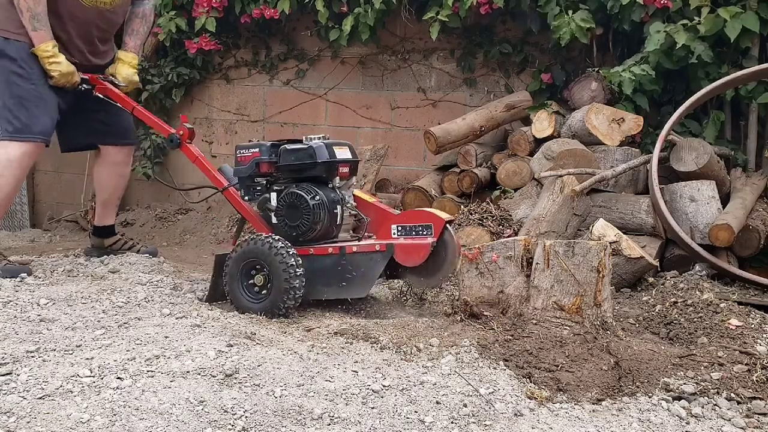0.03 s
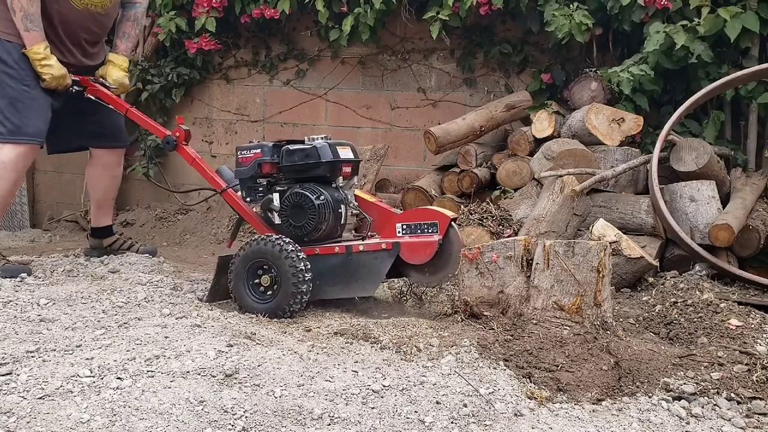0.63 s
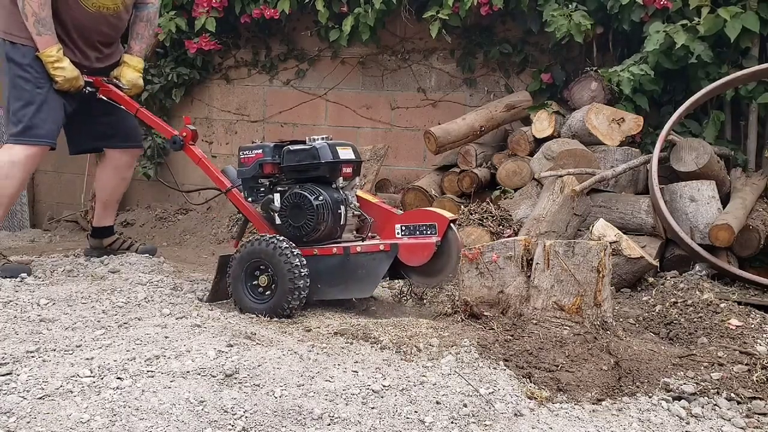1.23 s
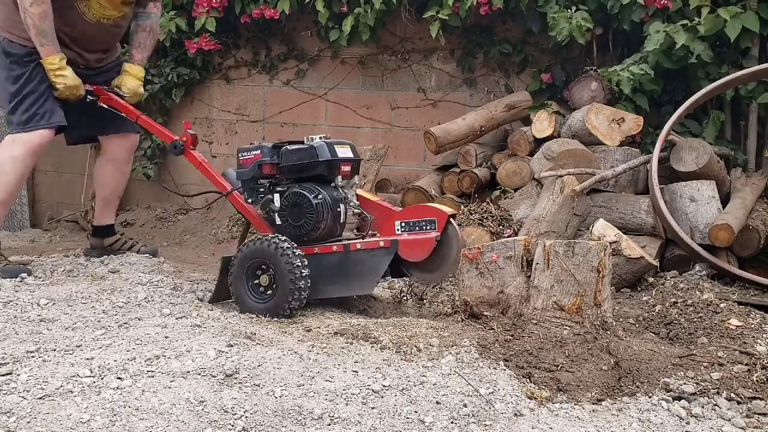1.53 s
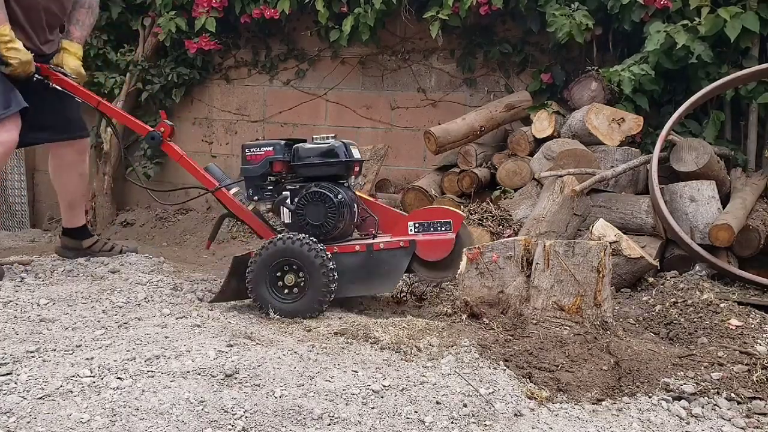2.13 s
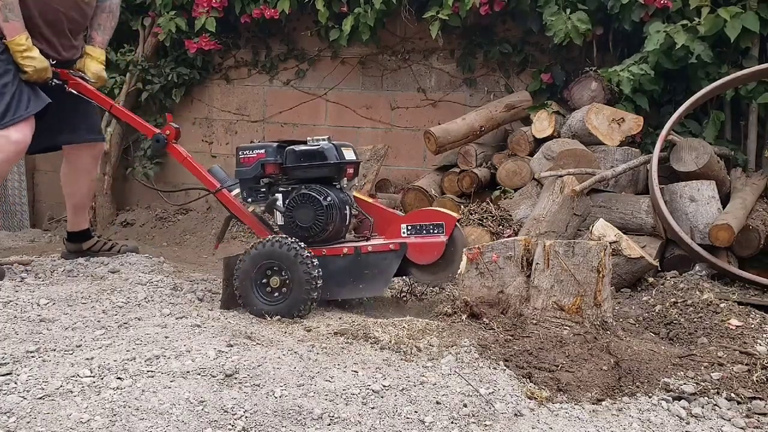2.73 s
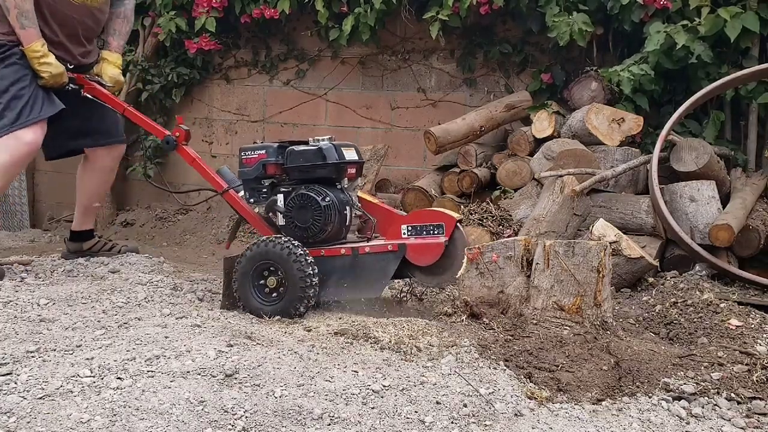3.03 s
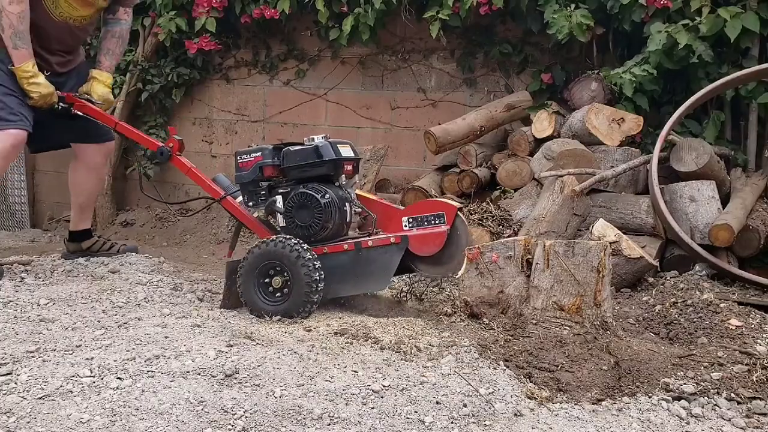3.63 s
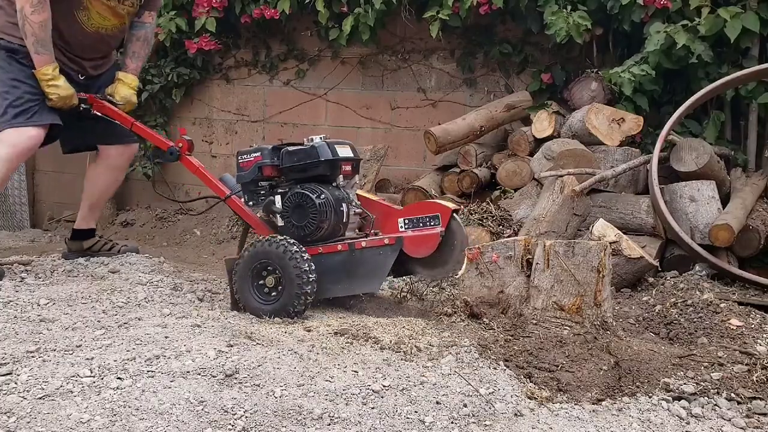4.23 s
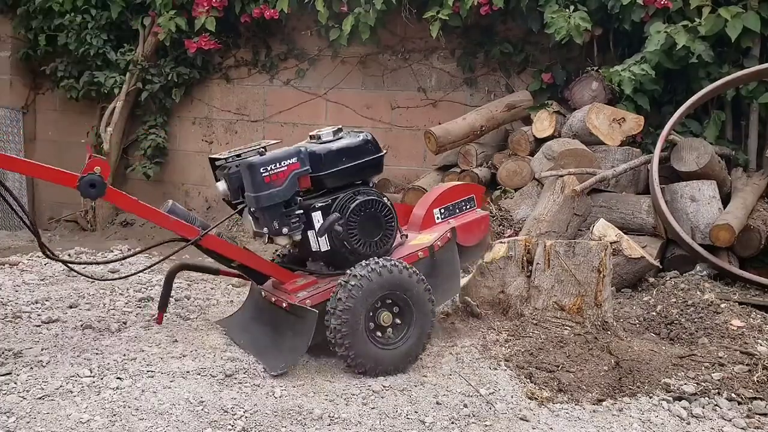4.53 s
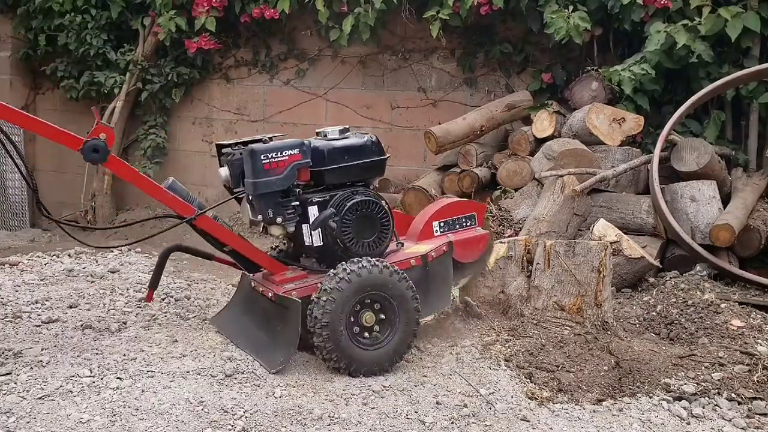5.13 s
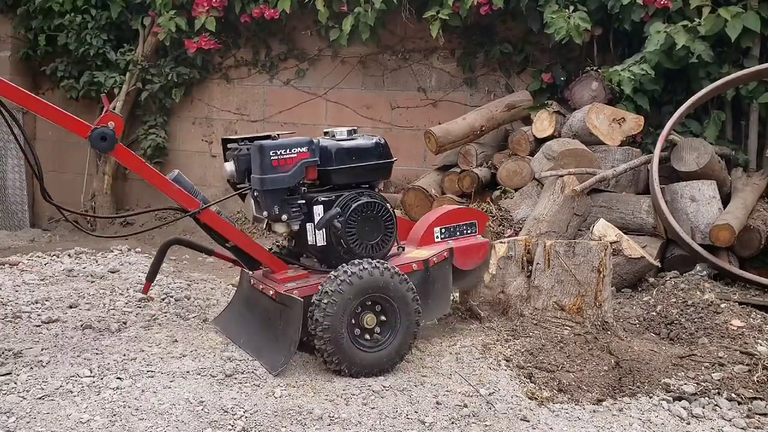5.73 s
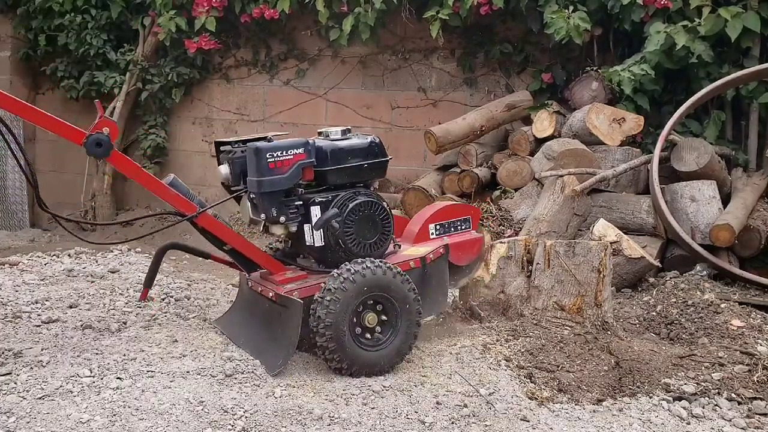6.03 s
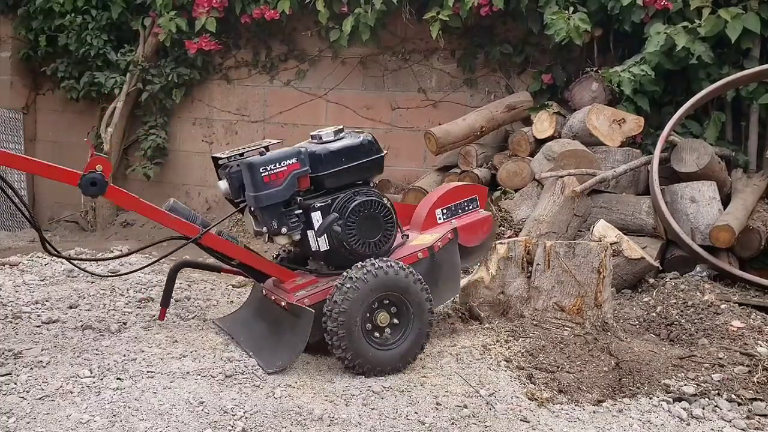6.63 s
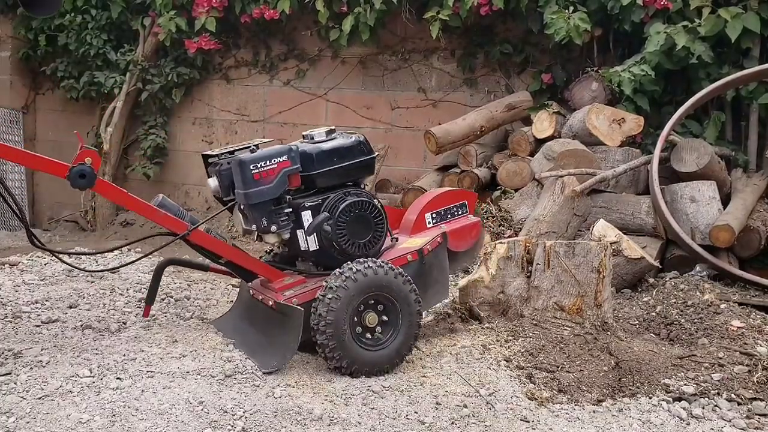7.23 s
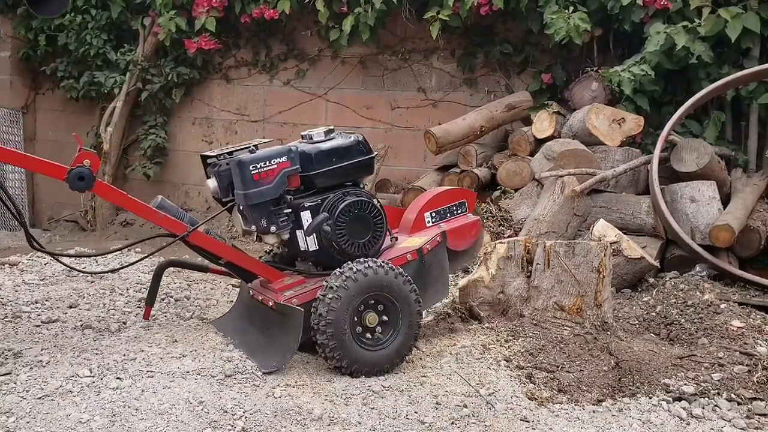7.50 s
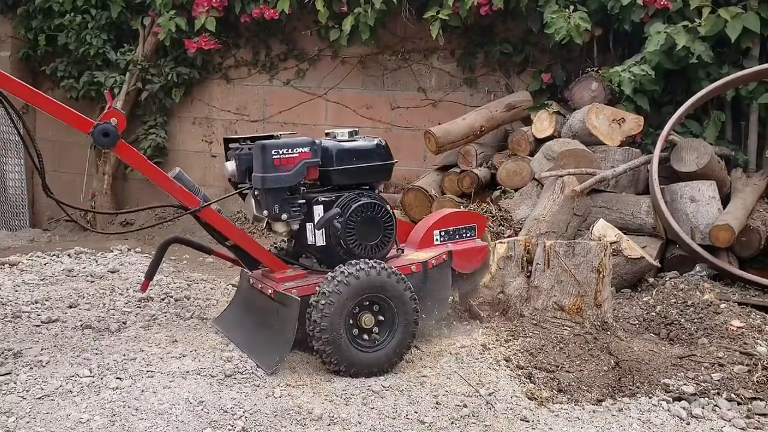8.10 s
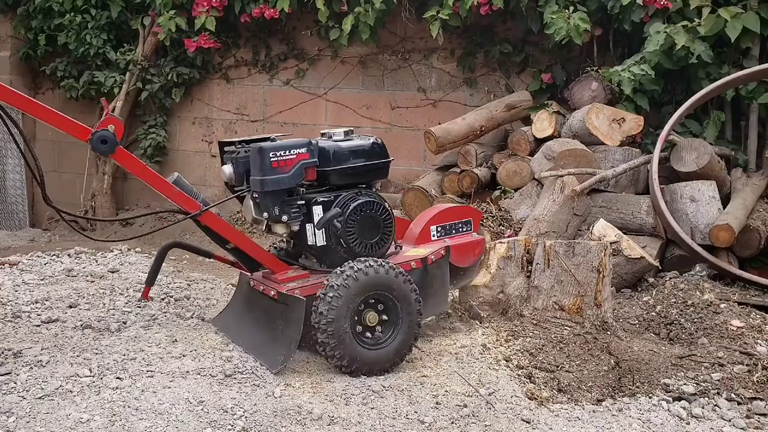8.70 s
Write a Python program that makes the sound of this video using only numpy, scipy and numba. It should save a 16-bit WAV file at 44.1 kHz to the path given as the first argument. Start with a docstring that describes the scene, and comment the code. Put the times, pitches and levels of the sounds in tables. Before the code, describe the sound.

Harsh, hissing rasp of a cutter wheel chewing a tree stump, over the high drone of a small petrol engine, all quick as if sped up. The pitch dips with each push into the wood, and thin steel squeaks and brief grating rings come and go. Midway the sound turns a little closer, and a few short jams rattle the machine near the end. Only a faint outdoor rumble lies behind it.

```python
"""Stump grinder in fast motion

A single-cylinder grinder works before a yard wall, sped up so that all is high and quick.
The governed engine sags under each push of the wheel and recovers between.
Teeth rasp through wood and throw chips; rubbing steel squeals in chirps.
Halfway through, the machine stands nearer, turned the other way, and deep bites make it judder."""
import sys
import numpy as np
from scipy import signal
from scipy.fft import rfft, irfft
from scipy.io import wavfile
from scipy.ndimage import uniform_filter1d, map_coordinates
from numba import njit

SR = 44100
rng = np.random.default_rng(int(sys.argv[2]) if len(sys.argv) > 2 else 0)


def generate_wav(sig):
    """Save sig (samples, or channels by samples) to the path in sys.argv[1] as 16-bit PCM at SR."""
    pcm = np.round(np.clip(np.atleast_2d(sig).T, -1, 1) * 32767).astype(np.int16)
    wavfile.write(sys.argv[1], SR, pcm)


N = 395136
TIME_S = np.arange(N) / SR


def undb(db):
    """Decibels to gain."""
    return 10 ** (np.asarray(db) / 20)


def unit(x):
    """Scale to rms 1."""
    return x / np.sqrt(np.mean(x ** 2))


def curve(table):
    """Join (time_s, value) rows by straight lines."""
    return np.interp(TIME_S, *np.transpose(table))


def gate(start_s, end_s, fade_s, edge_gain=0):
    """Trapezoid window passing through edge_gain at start and end."""
    return np.clip(np.minimum(TIME_S - start_s, end_s - TIME_S) / fade_s + edge_gain, 0, 1)


def walk(rate_hz):
    """Smooth random motion, spread near 1."""
    coarse_s = TIME_S[::10]
    knots = rng.standard_normal(len(coarse_s))
    return np.interp(TIME_S, coarse_s, map_coordinates(knots, [coarse_s * rate_hz], order=2, mode="wrap"))


def turns(hz):
    """Running phase in radians."""
    return 2 * np.pi * np.cumsum(hz) / SR


def colour(x, hz, db):
    """Filter by a spectrum drawn over log frequency."""
    bins_hz = np.maximum(np.arange(N // 2 + 1) * SR / N, 1)
    return irfft(rfft(x) * undb(np.interp(np.log(bins_hz), np.log(hz), db)), N)


def resonate(x, modes):
    """Sum of resonances, each at its own rms level."""
    return sum(undb(db) * unit(signal.lfilter(*signal.iirpeak(hz, hz / width_hz, SR), x))
               for hz, width_hz, db in modes)


@njit
def follow(x, initial, rise_s, fall_s):
    """One-pole lag with separate rise and fall times."""
    lagged, state = np.empty(len(x)), initial
    for i in range(len(x)):
        state += (x[i] - state) / (SR * (rise_s if x[i] > state else fall_s))
        lagged[i] = state
    return lagged


# stereo width: freq_hz, side_gain_db
SIDE_SPECTRUM = [(100, -1.5), (500, 2.5), (1200, -3), (3200, -56), (4300, -14.5), (8000, -9.5),
                 (15000, -7.5)]

def spread(mid, scattered):
    """Scattered sound makes the two ears differ."""
    side = colour(scattered, *np.transpose(SIDE_SPECTRUM))
    return np.array([mid + side, mid - side])


GOVERNED_HZ = 236.43  # unloaded firing rate
# pushes of the wheel into the stump: start_s, end_s, sag_hz
WHEEL_PUSHES = [(0.0, 0.101, 17.6), (0.119, 0.182, 19.8), (0.219, 0.318, 22.7), (0.343, 0.411, 19.7),
                (0.448, 0.759, 21), (0.785, 1.12, 20.5), (1.139, 1.445, 22.6), (1.504, 1.688, 15.8),
                (1.705, 1.82, 26), (1.853, 2.166, 22.9), (2.213, 2.728, 22.1), (2.766, 2.99, 22.3),
                (3.018, 3.344, 23.2), (3.366, 3.583, 20.6), (3.601, 4, 21.4), (4.033, 4.23, 25),
                (4.247, 4.399, 15.7), (4.496, 4.859, 12.7), (4.937, 5.029, 21), (5.062, 5.473, 28.4),
                (5.537, 5.874, 16.6), (5.91, 6.006, 27.7), (6.034, 6.206, 17.3), (6.231, 6.493, 24.5),
                (6.505, 6.755, 13.2), (6.755, 6.81, 44), (6.81, 7.019, 21), (7.347, 7.709, 18),
                (7.977, 8.391, 10.1), (8.451, 8.555, 19), (8.607, 8.929, 8.6)]

def firing_rate(jam_sag_hz=38.28, flywheel_s=.088, recover_s=.049, crank_s=.024, hunt_hz=1.3):
    """Pushes and jams drag the engine down; the governor restores it; crank inertia rounds each change."""
    loads = list(WHEEL_PUSHES) + [(start, end, jam_sag_hz) for start, end, _ in JAMS]
    load_hz = sum(hz * ((TIME_S >= start) & (TIME_S < end)) for start, end, hz in loads)
    sag_hz = follow(load_hz, WHEEL_PUSHES[0][2] / 2, flywheel_s, recover_s)  # starts mid-cut
    return GOVERNED_HZ - uniform_filter1d(sag_hz, int(crank_s * SR)) + hunt_hz * walk(28)


# throttle: time_s, level_db
THROTTLE = [(0, -31), (.1, -30), (1.4, -28), (2.7, -30), (4.5, -28), (6.7, -28), (6.85, -31.5),
            (7.25, -24.5), (7.68, -28), (7.75, -23.5), (8.1, -29.5), (8.96, -26.5)]
# exhaust harmonics: order, far_db, far_fast_change_db, near_db, near_fast_change_db
EXHAUST_ORDERS = [(1, -31.5, -1, -34, 0.5), (2, -12, -9, -11, 1), (3, -10.5, -0.5, -9, 0.5),
                  (4, -14, 8.5, -14.5, 0), (5, -3, 0.5, -3, 1), (6, -10, -3, -7, 3),
                  (7, -20.5, 0, -7.5, -2.5), (8, -26, -13, -24.5, 6), (9, -14.5, -11, -10, -4.5),
                  (10, -23.5, 1.5, -21, 2), (11, -15, 5.5, -35, -17)]

def engine(firing_hz, near, jammed, choke_db=-8, waver_db=1.19, flicker_db=.4, smear_rad=.52):
    """Exhaust harmonics slide with speed over the peaks and notches of the wall's echo; jams choke them."""
    fast = np.tanh((firing_hz - 219) / 11)
    phase = turns(firing_hz * (1 + .0015 * walk(150)))
    exhaust = 0
    for order, far_db, far_fast_db, near_db, near_fast_db in EXHAUST_ORDERS:
        db = (1 - near) * (far_db + far_fast_db * fast) + near * (near_db + near_fast_db * fast)
        unsteady = np.clip(order / 5, 1, 2)
        gain = undb(db + unsteady * (waver_db * walk(14) + flicker_db * walk(110)))
        # the silencer scatters the phases of each pulse
        angle = round(order) * phase - np.pi / 2 + smear_rad * rng.standard_normal()
        skew = min(2 / order, 1)  # low orders reach the ears unequally
        pan, lead_rad = undb(3.5 * skew ** 2 / 2), .14 * max(skew, .5)
        exhaust += gain * np.sqrt(2) * np.array([np.sin(angle + lead_rad) / pan, np.sin(angle) * pan])
    return undb(curve(THROTTLE) + choke_db * jammed) * exhaust


# cutter wheel harmonics: tooth_order, level_db
WHEEL_ORDERS = [(1, -20), (2, -16.5), (3, -10), (4, -21), (5, -13.5)]

def wheel(tooth_hz, slip=.00308, waver_db=3.5, gain_db=-1):
    """The teeth hum, unsteady as the belt slips, louder with throttle, snatches and scraping."""
    drive_db = curve(THROTTLE) + gain_db + 1.5 * snatch_db() + .38 * curve(SIDE_SCRAPE)
    phase = turns(tooth_hz * (1 + slip * walk(25)))
    lead_rad = np.array([[.013], [0]])
    hum = sum(undb(db + waver_db * walk(28)) * np.sin(round(order) * phase + lead_rad)
              for order, db in WHEEL_ORDERS)
    return undb(drive_db) * np.sqrt(2) * hum


# depth of cut: time_s, level_db
CUT_DEPTH = [(0, -27.5), (0.57, -31.5), (0.65, -28.5), (1.5, -27.5), (1.66, -29.5), (2.44, -26.5),
             (2.72, -30), (3.1, -28.5), (3.69, -28.5), (4.3, -27.5), (5.74, -25.5), (5.89, -28.5),
             (6.6, -24.5), (6.85, -30), (7.14, -24), (7.81, -23.5), (8.31, -28.5), (8.96, -25)]
# wood scraping the wheel's side: time_s, disc_ring_db
SIDE_SCRAPE = [(0, -6.5), (2.3, -1), (4.4, -10), (5.4, 1.5), (5.82, 5.5), (5.879, -3), (6.5, -2.5),
               (7.6, -15), (8.1, 5), (8.3, 4), (8.6, -26)]
# rasp through the wheel housing: freq_hz, far_db, near_db
RASP_SPECTRUM = [(150, -33, -34), (324.9, -23, -23.5), (805, -15.5, -16.5), (884, -15, -14.5),
                 (1360, -6, -5), (1550, -1, -2), (1690, -5.5, -9), (2030, -5, -7.5), (3110, -2.5, -2),
                 (3450, 2, -5), (4080, 1, -1), (4900, 2, 1), (5000, -2.5, -0.5), (5340, 3, 1),
                 (6620, -2, -1), (7500, -6, -10.5), (8950, -5.5, -7.5), (10000, -11.5, -7),
                 (10500, -4, -6.5), (16000, -9, -12)]
# chip guard ring: pitch_hz, width_hz, level_db
GUARD_MODES = [(4347, 84, -0.1)]
# wheel disc ring: pitch_hz, width_hz, level_db
DISC_MODES = [(5500, 390, 0.5), (5930, 140, 1)]

def rasp(firing_hz, tooth_hz, near, grain_db=3, fibre_db=10, body_hz=1000, full_sag_hz=19, gain_db=-6):
    """Wood fibres snap, bunched by firings and teeth; chips ring the flexing guard and disc."""
    beat = (1 + .029 * np.cos(turns(firing_hz))) * (1 + .15 * np.cos(turns(tooth_hz)))
    force = beat * undb(.9 * walk(240) + .5 * walk(1500))
    freq_hz, far_db, near_db = np.transpose(RASP_SPECTRUM)
    bite = np.sqrt(np.clip((GOVERNED_HZ - firing_hz) / full_sag_hz, .1, 2))  # deep bites add low body
    guard_gain = undb(1.5 * walk(22) - near)
    disc_gain = undb(curve(SIDE_SCRAPE) + .9 * walk(25))
    flexed_index = np.arange(N) + .006 * np.cumsum(walk(10))  # drifts the ring pitch
    pair = []
    for _ in range(2):
        snaps, chips = force * rng.standard_normal((2, N)) * undb(grain_db * rng.standard_normal((2, N)))
        fibres = (1 - near) * unit(colour(snaps, freq_hz, far_db))
        fibres += near * unit(colour(snaps, freq_hz, near_db))
        body = signal.filtfilt(*signal.butter(2, body_hz, fs=SR), fibres)
        rings = guard_gain * resonate(chips, GUARD_MODES) + disc_gain * resonate(chips, DISC_MODES)
        rings = map_coordinates(rings, [flexed_index], mode="mirror")
        pair.append(undb(fibre_db) * (fibres + (bite - 1) * body) + rings)
    return undb(curve(CUT_DEPTH) + gain_db + snatch_db()) * spread(*pair)


# open air: freq_hz, level_db
YARD_SPECTRUM = [(100, 1.5), (220, 5.5), (500, -10), (3000, -7.5)]

def yard(level_db=-57, width=.19):
    """Faint outdoor rumble."""
    mid, side = (unit(colour(rng.standard_normal(N), *np.transpose(YARD_SPECTRUM))) for _ in range(2))
    return undb(level_db) * np.array([mid + width * side, mid - width * side])


# chirps of rubbing steel: start_s, length_s, level_db
CHIRPS = [(0.132, 0.039, -17.5), (0.246, 0.051, -23), (0.345, 0.052, -15), (0.678, 0.032, -24),
          (1.028, 0.048, -21.5), (1.329, 0.032, -21), (1.612, 0.037, -19.5), (1.72, 0.017, -16),
          (1.797, 0.039, -17.5), (1.966, 0.027, -23), (2.152, 0.047, -24), (2.271, 0.058, -23),
          (2.411, 0.091, -23), (2.56, 0.068, -15), (2.649, 0.038, -16), (2.794, 0.028, -24.5),
          (2.947, 0.074, -23), (3.085, 0.033, -19), (3.27, 0.035, -18), (3.658, 0.038, -19.5),
          (3.846, 0.057, -18.5), (3.989, 0.04, -24), (4.427, 0.043, -22), (4.534, 0.057, -23.5),
          (4.648, 0.024, -33), (4.987, 0.04, -22), (5.074, 0.042, -21), (5.627, 0.029, -23),
          (5.9, 0.06, -24), (6.046, 0.035, -24.5), (6.142, 0.035, -22), (6.249, 0.032, -23),
          (6.69, 0.044, -19), (7.923, 0.12, -22), (8.078, 0.08, -23), (8.282, 0.085, -18)]
# steel modes: pitch_hz, far_db, near_db
STEEL_MODES = [(10985, -17, -6), (11600, -11, -19), (12805, -24, -14), (13375, 0, 0), (15150, -26, -22)]

def squeal(near, rub_db=-38.5, flicker_db=2, wander=.0027, shiver=.0006397, gain_db=4):
    """Stick-slip pumps the steel modes and lets them ring down; between chirps they sing faintly."""
    buried = (TIME_S > 6.87) & (TIME_S < 7.92)  # rubbing eases with the wheel deep in wood
    power = undb(rub_db - 13 * buried + 7 * np.tanh(walk(28)) + 2 * walk(140)) ** 2
    for start_s, length_s, db in CHIRPS:
        past_crest = ((TIME_S - start_s) / length_s - .4) / .3
        steepness = np.where(past_crest < 0, 3, .93)
        power += undb(db) ** 2 * np.exp(-np.abs(past_crest) ** steepness)
    bend = 1 + wander * np.tanh(walk(15))
    modes = 0
    for hz, far_db, near_db in STEEL_MODES:
        phase = turns(hz * (bend + shiver * walk(300)))
        flicker = np.tanh(walk(90)) + np.tanh(walk(10)) / 2
        gain = undb(far_db + near * (near_db - far_db) + flicker_db * flicker)
        lead_rad = .71 + .31 * walk(3.14)
        modes += gain * np.array([np.sin(phase), np.sin(phase + lead_rad)])
    return undb(gain_db) * np.sqrt(2 * power) * modes


# teeth skimming the wood: start_s, end_s, harmonic_db
SKIMS = [(1.716, 1.85, -41), (3.8, 3.979, -40)]

def whines(tooth_hz, fade_s=.02, waver_db=10):
    """High harmonics of the tooth rate whistle and fall together as the engine sags."""
    envelope = sum(gate(start, end, fade_s) * undb(db) for start, end, db in SKIMS)
    phase = turns(tooth_hz)
    return envelope * sum(undb(waver_db * np.tanh(walk(5.5) / 2)) * np.sin(order * phase)
                          for order in range(18, 26))


# teeth on hard grain: start_s, end_s, pitch_hz, width_hz, level_db
HARD_GRAIN = [(2.241, 2.351, 7080, 160.1, -36), (2.284, 2.338, 4450, 450, -27),
              (3.799, 3.877, 5580, 260, -26), (5.276, 5.826, 6050, 220.2, -34)]

def grates(fade_s=.028):
    """Teeth grate on hard grain and a panel rings, short and rough."""
    pair = [sum(gate(start, end, fade_s, edge_gain=.5) * resonate(rng.standard_normal(N), [mode])
                for start, end, *mode in HARD_GRAIN) for _ in range(2)]
    return spread(*pair)


# knots in the wood: centre_s, rise_db
KNOTS = [(2.31, 1.5), (3.05, 4.5), (3.63, 4), (4.25, 1.5), (6.07, 2)]

def snatch_db(half_length_s=.06):
    """Brief rise in level as the teeth snatch at a knot."""
    return sum(db * np.exp(-((TIME_S - centre_s) / half_length_s) ** 2) for centre_s, db in KNOTS)


# deep bites that jam a tooth: start_s, end_s, level_db
JAMS = [(4.432, 4.442, -27), (6.907, 6.995, -28), (7.095, 7.192, -23), (7.288, 7.296, -23),
        (7.668, 7.72, -23)]
# shaking frame: freq_hz, level_db
FRAME_SPECTRUM = [(250, -37), (420, -3), (630, 5), (860, 4), (1150, -4.5), (2000, -5.5)]

def judder(firing_hz, fade_s=.0096):
    """A jammed tooth hammers the frame once a firing; returns the sound and the jam gate."""
    gates = [gate(start, end, fade_s, edge_gain=.5) for start, end, _ in JAMS]
    envelope = sum(window * undb(db) for window, (_, _, db) in zip(gates, JAMS))
    phase = turns(firing_hz * (1 + .05 * walk(320)))
    blows = unit(sum(np.cos(order * phase) for order in range(1, 10))) * (1 + .3 * walk(400))
    frame = unit(colour(blows, *np.transpose(FRAME_SPECTRUM)))
    return envelope * frame, sum(gates)


# high engine overtone: start_s, end_s, pitch_hz, level_db
HELD_OVERTONES = [(8.044, 8.329, 1829, -34)]

def held_overtone(fade_s=.02, waver_db=1.5, wander=.00311):
    """A high engine overtone stands out briefly as a steady tone."""
    sway, bend = undb(waver_db * walk(30)), 1 + wander * walk(40)
    return sum(gate(start, end, fade_s) * undb(db) * sway * np.sqrt(2) * np.sin(turns(hz * bend))
               for start, end, hz, db in HELD_OVERTONES)


def scene(move_s=4.43, far_pan_db=.3, near_pan_db=-.6):
    """One speed drives engine, belt and wheel; at move_s the machine switches from far to near."""
    firing_hz = firing_rate()
    tooth_hz = 2.7 * firing_hz
    near = np.clip((TIME_S - move_s) / .017, 0, 1)
    shake, jammed = judder(firing_hz)
    drone = engine(firing_hz, near, jammed) + wheel(tooth_hz)
    cutting = rasp(firing_hz, tooth_hz, near) + grates() + squeal(near) + whines(tooth_hz)
    pan_db = far_pan_db + near * (near_pan_db - far_pan_db)
    ear_gains = undb(np.array([pan_db, -pan_db]) / 2)
    return drone + shake + cutting * ear_gains + yard() + held_overtone()


def record(dry):
    """The microphone cuts the treble above 15.6 kHz."""
    return signal.sosfilt(signal.ellip(10, .2, 80, 15600, fs=SR, output="sos"), dry)


dry = scene()
out = record(dry)
generate_wav(out)
```